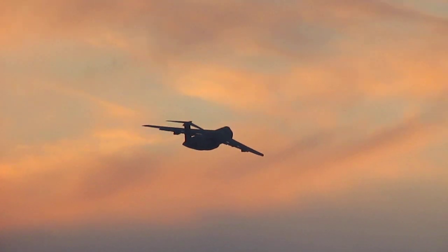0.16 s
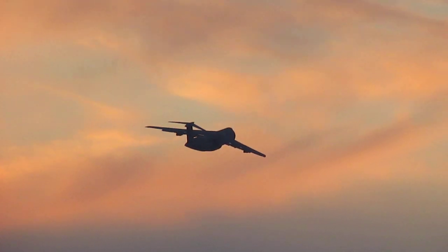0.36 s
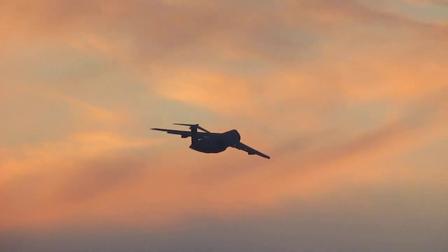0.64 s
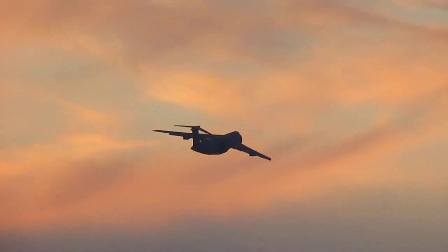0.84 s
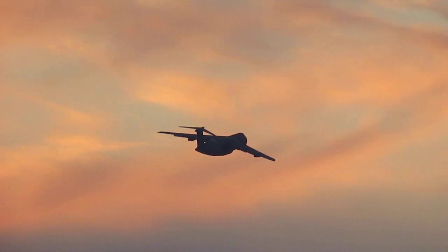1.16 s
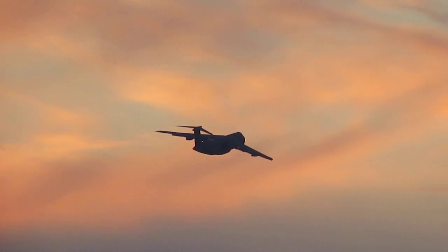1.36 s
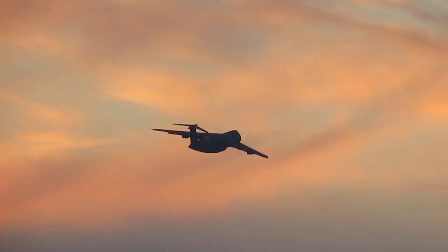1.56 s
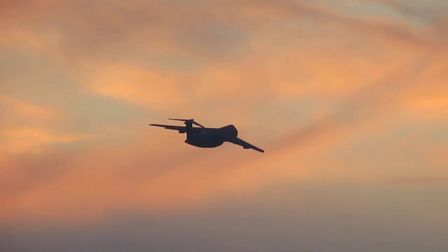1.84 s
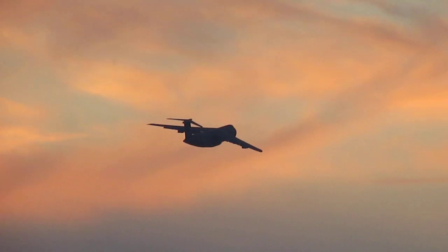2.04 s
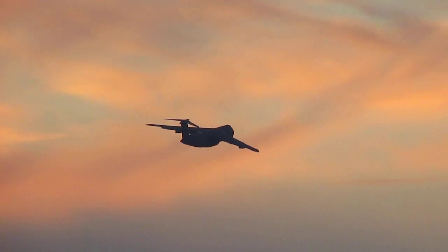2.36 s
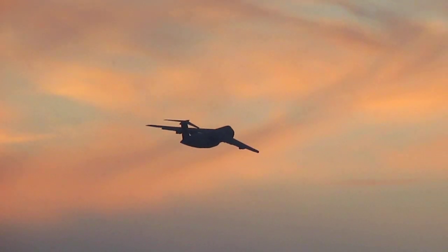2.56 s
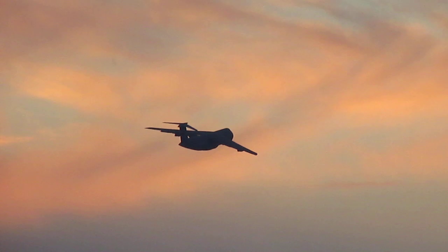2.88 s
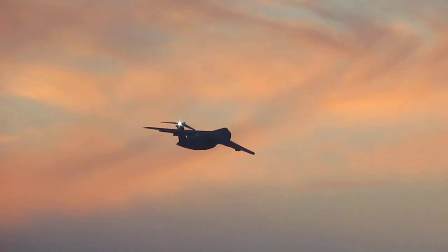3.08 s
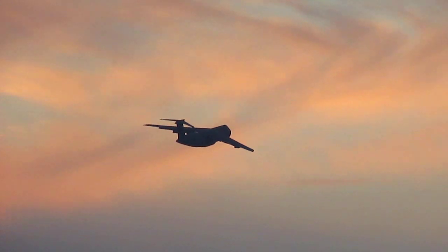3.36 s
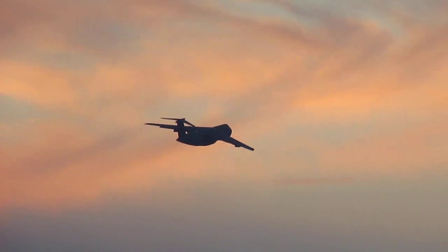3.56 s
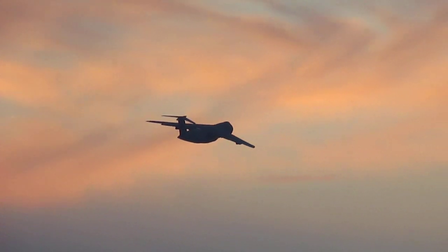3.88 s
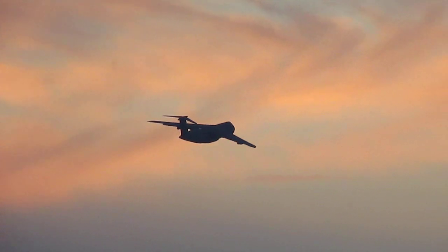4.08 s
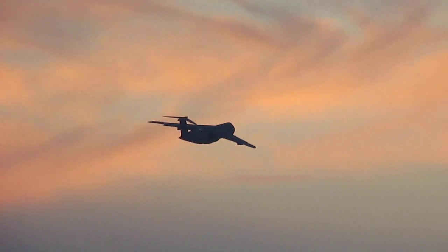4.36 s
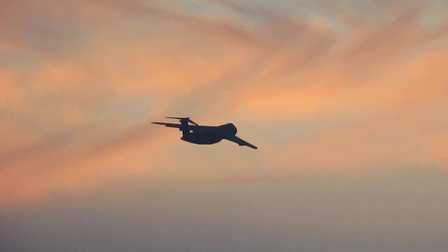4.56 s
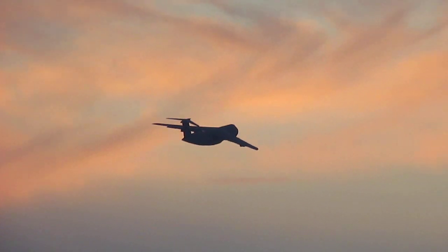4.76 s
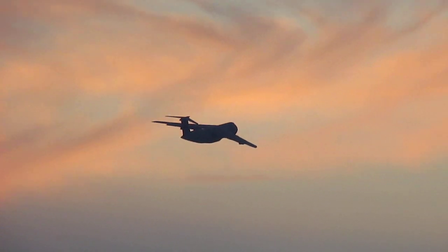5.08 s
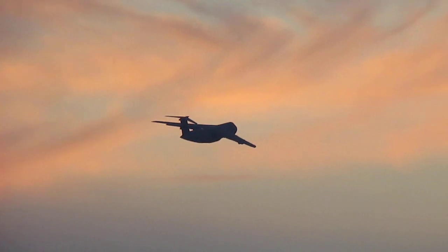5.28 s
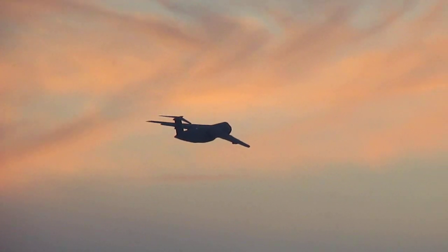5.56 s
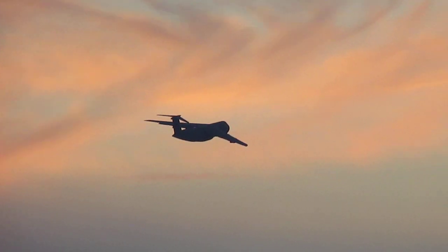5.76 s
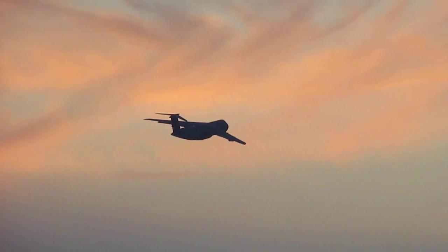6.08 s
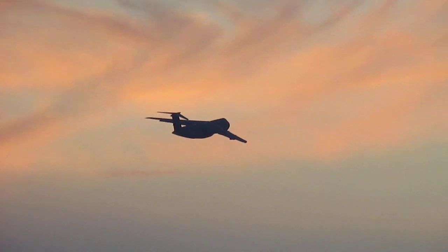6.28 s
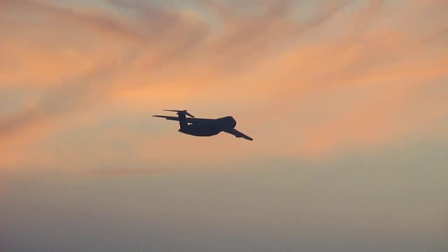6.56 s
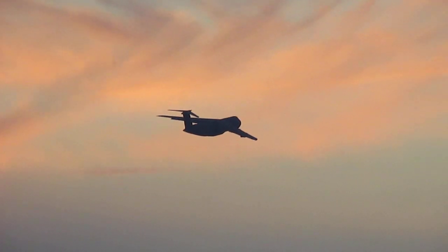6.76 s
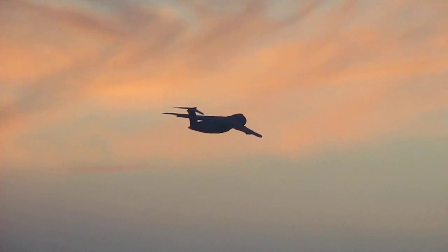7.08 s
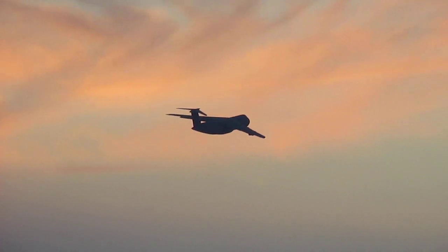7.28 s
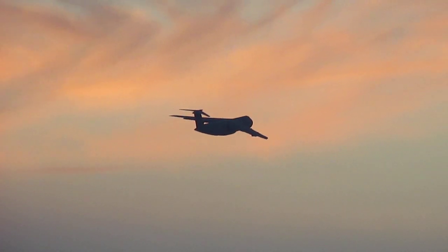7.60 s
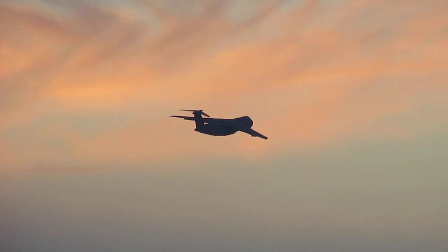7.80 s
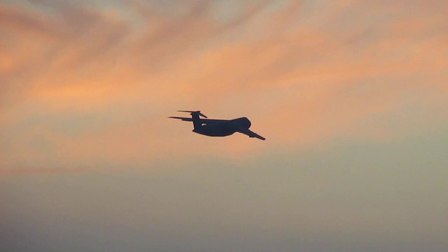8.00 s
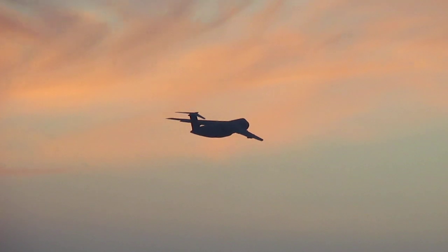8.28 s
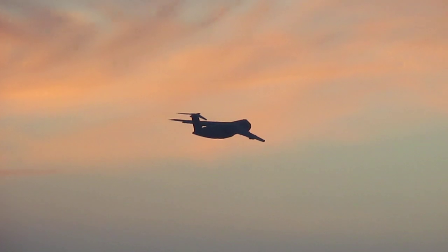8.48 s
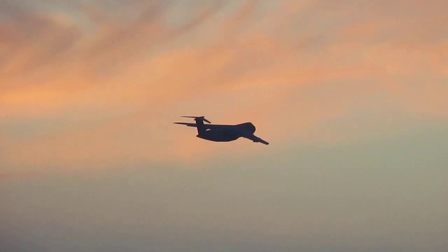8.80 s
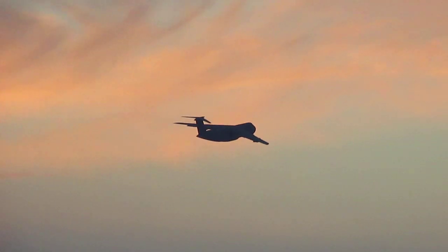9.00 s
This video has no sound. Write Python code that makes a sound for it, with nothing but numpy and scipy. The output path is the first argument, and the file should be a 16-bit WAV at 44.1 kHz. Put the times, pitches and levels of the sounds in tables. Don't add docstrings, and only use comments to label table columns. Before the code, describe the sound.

A large jet climbs away in the distance with a deep, steady rumble and faint whine, while wind buffets the microphone and camera shutters click nearby.

```python
import sys
import numpy as np
from scipy import signal
from scipy.io import wavfile
from scipy.ndimage import uniform_filter1d

SR = 44100
rng = np.random.default_rng(int(sys.argv[2]) if len(sys.argv) > 2 else 0)


def makeup_ratio(level_db):
    decades = np.asarray(level_db, float) / 20
    return 10 ** decades


def dump(signal):
    limited = np.clip(np.atleast_2d(signal).T, -1, 1)
    pcm = np.round(limited * 32767).astype(np.int16)
    wavfile.write(sys.argv[1], SR, pcm)


N = 403074
T = np.arange(N) / SR


def rms_one(x):
    return x / np.sqrt(np.mean(x ** 2) + 1e-20)


def levelled(x, size):
    power = uniform_filter1d(uniform_filter1d(x ** 2, size), size)
    return x / np.sqrt(power + 1e-9)


def in_time(rows):
    s, *columns = np.transpose(rows)
    return [np.interp(T, s, c) for c in columns]


def at_hz(points, hz):
    table_hz, value = np.transpose(points)
    return np.interp(np.log(hz), np.log(table_hz), value)


def held(start_s, length_s, attack_s, release_s):
    end_s = start_s + length_s
    return np.interp(T, [start_s - attack_s, start_s, end_s, end_s + release_s], [0, 1, 1, 0])


def bump(middle_s, length_s):
    return np.exp(-((T - middle_s) / length_s) ** 2)


def drift(rate_hz):
    r = np.exp(-80 * np.pi * rate_hz / SR)
    white = rng.standard_normal(N // 40 + 2002)
    slow = signal.lfilter([1], [1, -2 * r, r * r], white)[2000:]
    return np.interp(np.arange(N) / 40, np.arange(len(slow)), rms_one(slow))


def band(x, low_hz, high_hz, order=2):
    sos = signal.butter(order, [low_hz, min(high_hz, .45 * SR)], "band", fs=SR, output="sos")
    return signal.sosfilt(sos, x)


def at_ports(left, right, lag, pan_db):
    late = np.interp(np.arange(N) - lag, np.arange(N), left)
    return np.array([late * makeup_ratio(pan_db / 2), right * makeup_ratio(-pan_db / 2)])


def noise_bank(spectrum, level_db, likeness, patchy_db, rate_hz, count):
    # frequency in Hz, left-right difference in dB.
    ports = [(60, 0), (130, 0.5), (290, 0), (640, 0), (1410, -1.5), (3100, -6.5), (6820, 2.5),
             (15000, -1.5)]
    edges = np.geomspace(spectrum[0][0], spectrum[-1][0], count + 1)
    centres = np.sqrt(edges[1:] * edges[:-1])
    white = rng.standard_normal((2, 2, N))
    together = drift(rate_hz / 3)
    total = np.sum(makeup_ratio(at_hz(spectrum, centres)) ** 2 * np.diff(edges)) / SR * 4.4
    out = 0
    for k, hz in enumerate(centres):
        mid, side = band(white[k % 2], edges[k], edges[k + 1])
        alike = np.clip(likeness(hz), 0, 1)
        mid, side = np.sqrt(1 + alike) * mid, np.sqrt(1 - alike) * side
        flicker_db = patchy_db * (0.5 * together + drift(rate_hz))
        gain = makeup_ratio(at_hz(spectrum, hz) + level_db(hz) + flicker_db)
        port_db = at_hz(ports, hz)
        left, right = makeup_ratio(port_db / 2), makeup_ratio(-port_db / 2)
        out = out + gain * np.array([left * (mid + side), right * (mid - side)])
    return out / np.sqrt(total)


def narrow(hz, width_hz):
    phase = 2 * np.pi * np.cumsum(hz + 0 * T) / SR
    return drift(.75 * width_hz) * np.cos(phase) + drift(.75 * width_hz) * np.sin(phase)


def burst(at_s, low_hz, high_hz, decay_s):
    t = np.arange(2400) / SR
    strike = (rng.standard_normal(len(t)) + 5 * (t == 0)) * np.exp(-t / decay_s)
    x = band(strike, low_hz, high_hz, order=3)
    return round(at_s * SR), x / np.max(np.abs(x))


def add(out, start, x):
    out[..., start:start + x.shape[-1]] += x[..., :N - start]


def jet():
    # frequency in Hz, density in dB per Hz.
    exhaust_spectrum = [(22, -16.5), (45, 5.5), (70, 3), (130, 0.5), (200, -2.5), (400, -10.5), (520, -8.5),
                        (800, -12.5), (1250, -14.5), (1500, -33.5), (1750, -26), (2100, -32), (3000, -47.5),
                        (4200, -54.5)]
    # frequency in Hz, correlation 0-1.
    exhaust_likeness = [(30, 0.95), (150, 1), (500, 0.96), (1000, 0.93), (2000, 0.53), (4000, 0.33)]
    # time in seconds, rumble in dB.
    rumble_swing = [(0, -22.5), (1.6, -21.5), (3.2, -21), (4.4, -18), (5.2, -17), (6.0, -18), (7.0, -19.5),
                    (8.0, -20), (9.14, -21.5)]
    # frequency in Hz, width in Hz, level in dB.
    blade_tones = [(1069, 1.5, 0), (1075, 1.5, -12), (1084, 2.0, -9)]
    # frequency in Hz, width in Hz, level in dB.
    shafts = [(512.8, 14.5, -11), (591, 21, -13.5), (768, 19, -12)]
    # start in seconds, length in seconds, level in dB.
    whine_swells = [(1.985, 0.53, -38), (2.9, 0.4, -40), (3.45, .08, -36.5), (3.9, 0.34, -39.5),
                    (4.27, 0.37, -36), (4.82, 0.67, -35.5), (5.652, 0.11, -38.5), (6.1, .35, -42.5)]
    rumble_db, = in_time(rumble_swing)
    swing_db = rumble_db - rumble_db[0]
    roar_db = -31 + 0.71 * swing_db - 0.4031 * T
    top_db = -46 + 0.13 * swing_db - 0.12 * T

    def level_db(hz):
        low = np.clip(np.log2(420 / hz), 0, 1)
        high = np.clip(np.log2(hz / 950), 0, 1)
        return low * (rumble_db - .4) + (1 - low - high) * (roar_db + 9.5) + high * (top_db + 19.5)

    exhaust = noise_bank(exhaust_spectrum, level_db, lambda hz: at_hz(exhaust_likeness, hz),
                         patchy_db=0.89, rate_hz=3.3, count=20)
    whine = makeup_ratio(-51 - 0.1 * T)
    for s, length_s, db in whine_swells:
        whine = np.maximum(whine, makeup_ratio(db) * held(s, length_s, attack_s=0.17, release_s=0.093))
    blades = sum(makeup_ratio(db) * narrow(hz, width_hz) for hz, width_hz, db in blade_tones)
    tones = whine * levelled(blades, size=4000)
    tones += makeup_ratio(roar_db) * sum(makeup_ratio(db) * narrow(hz, width_hz) for hz, width_hz, db in shafts)
    tones += makeup_ratio(top_db - 4) * narrow(1738, 178)
    return at_ports(*(exhaust + tones), lag=1.33, pan_db=0.7)


def air():
    # frequency in Hz, density in dB per Hz.
    air_spectrum = [(2500, 15), (3100, -14), (4300, -23), (6200, 0.5), (8000, -12.5), (9300, -8),
                    (10500, -23.5), (12300, -12.5), (15700, -13)]
    return noise_bank(air_spectrum, lambda hz: -64.5, lambda hz: .45, patchy_db=.5, rate_hz=3.0, count=6)


def eddies(per_s):
    return rng.standard_normal((2, N)) * (rng.random((2, N)) < per_s / SR) + 1e-18


def wind():
    # middle in seconds, length in seconds, level in dB, share in the right port 0-1.
    spells = [(1.7, 0.11, -30.5, 1), (2.35, 0.41, -22.5, 0.87), (4.0, 0.12, -37, 0.6),
              (4.8, 0.19, -25, 0.14), (5.293, 0.13, -26, 0.08), (6.0, 0.24, -29, 0.3),
              (8.406, 0.41, -22.5, 0.44)]
    # middle in seconds, length in seconds, level in dB, relative flutter in dB.
    gusts_left = [(1.75, 0.043, -24, -19), (4.46, 0.043, -15, -20), (4.53, 0.051, -23, -13),
                  (4.716, 0.035, -15, -20), (5.81, 0.018, -12, -12), (8.1, 0.025, -18, -18),
                  (8.22, 0.016, -12, -5), (8.31, .025, -13, -5), (8.42, 0.065, -17, -17),
                  (8.47, 0.027, -14, -13), (8.65, .04, -18, -13), (8.7, .025, -13.5, -20),
                  (8.77, 0.028, -5.5, -18), (8.81, .035, -6, -0.5), (8.925, 0.044, -20, -23)]
    gusts_right = [(2.15, 0.066, -16.5, -27), (2.308, 0.027, -12, -18), (2.371, .03, -14, -8),
                   (2.435, 0.022, -7.5, -1.5), (2.6, 0.073, -16.5, -11), (2.753, 0.047, -15.5, -12),
                   (4.858, 0.033, -12.5, -28), (6.224, 0.052, -21, -17), (8.283, 0.056, -9, -14),
                   (8.316, 0.021, -12.5, -8), (8.402, 0.023, -11, -6), (8.434, .03, -12, -4),
                   (8.654, 0.038, -9.5, -2.5)]
    # time in seconds, height, width in seconds, port (0 left, 1 right).
    hard_eddies = [(1.797, -.7, .0025, 0), (2.322, .75, .002, 1), (2.334, .9, .0018, 1),
                   (2.353, -.8, .0015, 1), (2.357, .6, .0015, 1), (2.423, -.8, .0015, 1),
                   (2.4395, 1.1, .002, 1), (8.665, .7, .0017, 1), (9.122, 1.6, .0021, 0),
                   (9.1255, -.45, .0012, 0), (9.137, -.6, .0017, 0)]
    breeze = makeup_ratio(-55) ** 2
    for s, length_s, db, right in spells:
        breeze = breeze + makeup_ratio(db) ** 2 * np.clip([[1 - right], [right]], 0, 1) * bump(s, length_s)
    lumps = np.array([makeup_ratio(3.5 * drift(7.1)) for port in range(2)])
    buffet = breeze * lumps ** 2
    flutter = buffet * makeup_ratio(-28.0) ** 2
    for port, gusts in enumerate((gusts_left, gusts_right)):
        for s, length_s, db, flutter_db in gusts:
            first = max(0, round((s - 3 * length_s) * SR))
            span = slice(first, round((s + 3 * length_s) * SR))
            away = ((T[span] - s) / length_s) ** 2
            low_share = np.clip(1 - makeup_ratio(flutter_db) ** 2, .05, 1)
            buffet[port, span] += makeup_ratio(db) ** 2 * np.exp(-away / 0.3) * low_share
            flutter[port, span] += makeup_ratio(db + flutter_db) ** 2 * np.exp(-away / 0.14)
    low = levelled(band(eddies(110), 39, 129.0), size=1300)
    high = levelled(band(band(eddies(320), 120, 338), 140, 450), size=500)
    out = np.sqrt(buffet) * low + np.sqrt(flutter) * high
    for s, height, width_s, port in hard_eddies:
        start = round((s - .02) * SR)
        away = ((T[start:start + 1800] - s) / width_s) ** 2 / 2
        add(out[port], start, height * (1 - away * 1.5) * np.exp(-away))
    return out


def shutter():
    # main clack in seconds, peak in dB.
    shots = [(0.8524, -47.5), (1.2166, -49.5), (2.025, -48), (2.272, -51), (3.7326, -46.5)]
    # seconds from the clack, level in dB, low Hz, high Hz, decay in seconds.
    parts = [
        (-.089, -11, 6530, 9500, 0.0071),
        (-.071, -12, 6000, 8000, 0.0032),
        (0, -3.5, 6260, 9900, 0.0026),
        (.008, -3, 3200, 14000, .004),
        (.066, -11, 4970, 14800, 0.02),
    ]
    camera = np.zeros(N)
    whirr = rms_one(band(rng.standard_normal(N), 5800, 12000))
    for s, peak_db in shots:
        winding = held(s - .085, .17, attack_s=.01, release_s=.03)
        camera += makeup_ratio(peak_db - 21) * winding * whirr
        for after_s, db, low_hz, high_hz, decay_s in parts:
            start, clack = burst(s + after_s, low_hz, high_hz, decay_s)
            add(camera, start, makeup_ratio(peak_db + db + 11) * clack)
    return at_ports(camera, camera, lag=0.85, pan_db=0.5)


def squeal(level, hz, width_hz, skirt_db, throb_db):
    level = level * makeup_ratio(throb_db * drift(22))
    direct = narrow(hz, width_hz) + makeup_ratio(skirt_db) * narrow(hz, 240)
    scattered = makeup_ratio(-14.5) * narrow(hz, 90) * [[1], [-1]]
    return at_ports(*(level * (direct + scattered)), lag=5.0, pan_db=0.5)


def brakes():
    # start in seconds, length in seconds, frequency in Hz, level in dB.
    far_brakes = [
        (1.1, 1.3, 9340, -73),
        (2.45, .45, 9180, -78),
        (2.25, .55, 8960, -74),
    ]
    # time in seconds, level in dB.
    near_brake = [(6.39, -70), (6.52, -51.5), (6.8, -55.5), (6.92, -49), (7.03, -60), (7.74, -55),
                  (7.83, -65.5), (8.27, -79), (8.76, -77)]
    out = 0
    for s, length_s, hz, db in far_brakes:
        level = makeup_ratio(db) * held(s, length_s, attack_s=.2, release_s=.12)
        sagging_hz = hz - 40 * (T - s)
        out = out + squeal(level, sagging_hz, 45, -2.0, throb_db=2.0)
    start_s, end_s = near_brake[0][0], near_brake[-1][0]
    near = makeup_ratio(in_time(near_brake)[0] + 3.5) * held(start_s, end_s - start_s, .05, .02)
    return out + squeal(near, 9055, 30, -3.5, throb_db=1.0)


def knock():
    # frequency in Hz, level in dB, decay in seconds.
    modes = [(620, -23, .008), (805, -14, .012), (930, -17, .011)]
    t = np.arange(4000) / SR
    rings = sum(makeup_ratio(db) * np.exp(-t / decay_s) * np.sin(2 * np.pi * hz * t) for hz, db, decay_s in modes)
    out = np.zeros(N)
    add(out, round(1.168 * SR), rings * (1 - np.exp(-t / .0015)))
    return at_ports(out, out, lag=1.5, pan_db=-4.0)


def tyres():
    # frequency in Hz, density in dB per Hz.
    tread_spectrum = [(2000, -8), (2600, 2), (3200, 4.5), (4300, -0.5), (5500, 4), (7000, -5), (8300, -7.5),
                      (9300, -3.5), (10500, -16), (13500, -10), (15700, -24)]
    # frequency in Hz, correlation 0-1.
    tread_likeness = [(2000, 0.45), (5000, 0.13), (9000, 0.81), (15000, .5)]
    # time in seconds, hiss in dB.
    passing = [(3.0, -87.5), (3.8, -59.5), (4.4, -56.5), (4.62, -52.5), (5.2, -50.5), (5.4, -48.5),
               (6.1, -57.5), (7.3, -56), (9.0, -65.5)]
    # middle in seconds, hiss in dB, relative top in dB.
    grit = [(4.3, -56.5, -17), (4.62, -55.5, -13), (4.86, -59, -15), (5.3, -56, -20), (5.65, -56, -18),
            (6.88, -61, -12)]
    grit_s, closest_s = .08, 7.1
    road = makeup_ratio(in_time(passing)[0]) ** 2
    hiss = road + sum(makeup_ratio(db) ** 2 * bump(s, grit_s) for s, db, _ in grit)
    grit_top = sum(makeup_ratio(db) ** 2 * bump(s, grit_s) for s, _, db in grit)
    top = road * makeup_ratio(-17.5) ** 2 + hiss * grit_top
    hiss_db, top_db = 10 * np.log10(hiss), 10 * np.log10(top) + 14.0
    duller_db_per_octave = 3.5 * np.maximum(T - closest_s, 0)

    def level_db(hz):
        return top_db if hz > 9500 else hiss_db + duller_db_per_octave * np.log2(5000 / hz)

    noise = noise_bank(tread_spectrum, level_db, lambda hz: at_hz(tread_likeness, hz),
                       patchy_db=2.2, rate_hz=10.0, count=12)
    singing = rms_one(band(rng.standard_normal(N), 6300, 7600))
    noise += makeup_ratio(hiss_db - 6) * bump(6.16, 1) * singing
    return at_ports(*noise, lag=6.0, pan_db=-1.0)


def snap():
    # time in seconds, peak in dB, low Hz, high Hz, decay in seconds, left-right in dB.
    taps = [
        (9.085, -26, 1700, 2150, .002, -4),
        (9.0852, -16.5, 3000, 6500, .0014, -4),
        (9.0852, -23, 6000, 12500, .0007, -4),
    ]
    out = np.zeros((2, N))
    for s, db, low_hz, high_hz, decay_s, pan_db in taps:
        start, clack = burst(s, low_hz, high_hz, decay_s)
        add(out, start, makeup_ratio(db + pan_db * np.array([[.5], [-.5]])) * clack)
    return out


def scene():
    return jet() + air() + wind() + shutter() + brakes() + knock() + tyres() + snap()


def roll_off(x):
    return signal.sosfilt(signal.butter(12, 15680, fs=SR, output="sos"), x)


def record(dry):
    # start in seconds, gain in dB.
    ducks = [
        (2.37, -2.5),
        (8.68, -1),
    ]
    wide = 1.063 * (dry - .29 * dry[::-1])
    gain_db = sum(db * held(s, 0.37, attack_s=0.036, release_s=0.66) for s, db in ducks)
    notched = signal.lfilter(*signal.iirnotch(7886, 70, SR), wide * makeup_ratio(gain_db))
    clipped = np.clip(notched, -1, 1)
    return roll_off(clipped)


dry = scene()
out = record(dry)
dump(out)
```